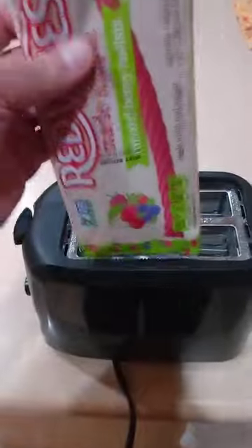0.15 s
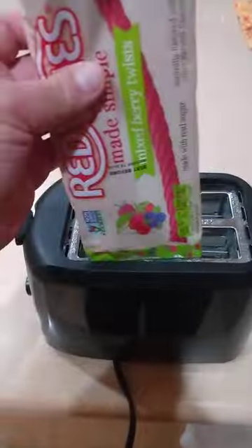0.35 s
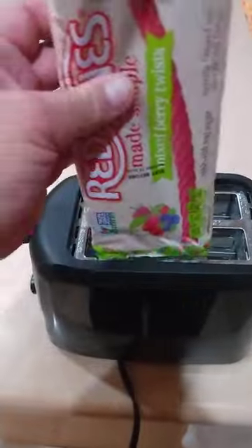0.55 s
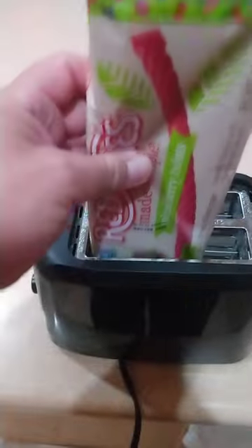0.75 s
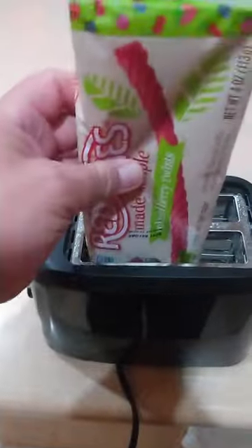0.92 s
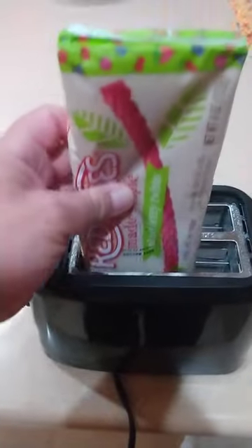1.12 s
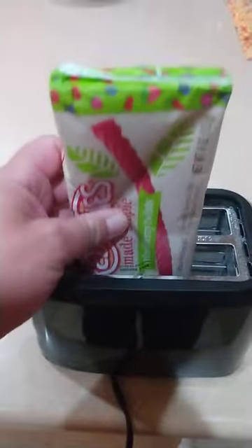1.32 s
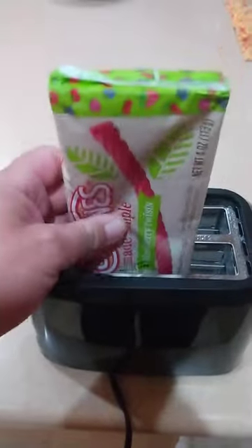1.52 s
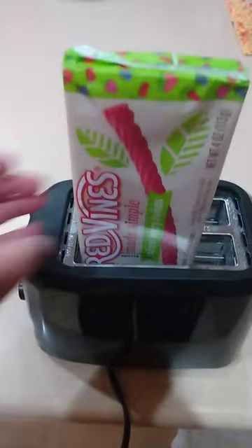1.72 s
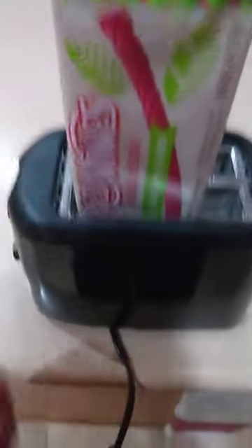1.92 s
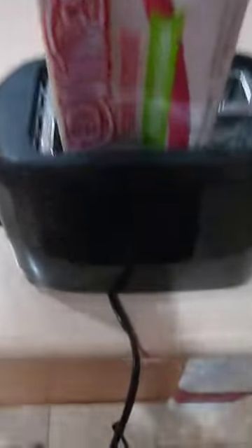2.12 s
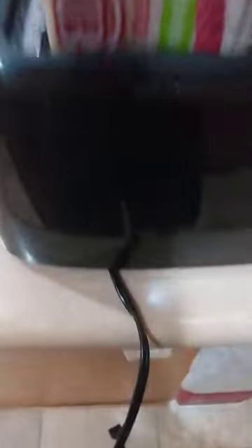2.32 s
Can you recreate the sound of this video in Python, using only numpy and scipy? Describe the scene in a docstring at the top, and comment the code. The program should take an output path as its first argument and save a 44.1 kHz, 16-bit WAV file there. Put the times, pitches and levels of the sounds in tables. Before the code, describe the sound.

A stiff plastic candy packet crinkles close to a phone microphone: faint clicks, a sharp snap and crackle, a longer rustling burst as it slides into a toaster slot, then scattered ticks and quiet in a small kitchen.

```python
"""Faint clicks of film over soft rubbing come first, then loud bursts of snaps and crackle, then quiet.
A stiff plastic packet is pushed by hand into a toaster slot in a small kitchen.
Slips of each crease ring short film modes; rubbing is crackle and noise, with a low push of the hand.
The toaster knocks softly as a low ringing tone, and a low drone, made of ringing noise, wavers.
Soft room noise and echoes of the snaps lie behind. A phone microphone gives a narrow band."""
import sys
import numpy as np
from scipy import signal
from scipy.fft import rfft, irfft
from scipy.io import wavfile

SR = 44100
rng = np.random.default_rng(int(sys.argv[2]) if len(sys.argv) > 2 else 0)


def wav_record(signal):
    """Record a signal, one row per channel, as 16-bit PCM in the file named by sys.argv[1]."""
    frames = np.transpose(np.atleast_2d(signal))
    bounded = np.clip(frames, -1, 1)
    # unit amplitude maps onto the largest positive 16-bit level
    quanta = np.round(bounded * 32767).astype(np.int16)
    wavfile.write(sys.argv[1], SR, quanta)


def amplitude_ratio(level_db):
    """Convert a level in decibels to the matching linear amplitude (field) ratio."""
    exponent = np.asarray(level_db, float) / 20
    return 10 ** exponent


N = 103635  # samples, 2.35 s

# Snaps: modes spread about this far either side of the pitch (octaves) and die by 60 dB in T60.
PANEL_SPREAD_OCT, PANEL_T60_S = 0.683, 0.012
FACET_SPREAD_OCT, FACET_T60_S = 0.38, 0.0084
TICK_HZ, TICK_SPREAD_OCT, TICK_T60_S = 6680, 0.4, 0.0052
THUMP_HZ, THUMP_SPREAD_OCT, THUMP_T60_S = 390.6, 0.66, 0.018
OUTER_MODE_DB = -4.5  # the outermost modes are weaker
SLIP_FALL_S, SLIPS_PER_S, AFTERSLIP_DB = 0.0054, 2400, -16  # AFTERSLIP_DB: typical size at the start

# Creases that snap: [t/s, wide panel peak level/dB, panel f/Hz, narrow facet peak level/dB, facet f/Hz,
# treble tick peak level/dB, thump peak level/dB]
CREASE_SNAPS = [(0.0339, -44, 1130, -49, 3700, -52.5, -67), (0.045, -52.5, 1270, -54, 2940, -72, -72),
                (0.0862, -71, 1370, -66, 3300.0, -67, -63), (0.091, -58, 1440, -61, 3410.0, -59, -65),
                (0.1199, -54, 1780, -55.5, 4030, -56.5, -80), (0.2146, -45, 1650, -46, 3070, -78, -51),
                (0.2232, -27.5, 1750, -29, 3110, -39, -41.5),
                (0.2313, -28.5, 1495, -30.5, 3280, -33, -46.5),
                (0.2604, -29, 1170, -29.5, 3640, -31, -31.5), (0.2631, -12, 1410, -29, 4090, -24, -32),
                (0.2688, -33, 1150, -28.5, 3320, -37, -41), (0.272, -30, 1236, -30, 4600, -38, -35.5),
                (0.2756, -28, 1670, -27.5, 2680, -31, -34.5), (0.3013, -32.5, 1500, -35.5, 3030, -46, -45),
                (0.3524, -37.5, 1590, -43, 3130, -50.5, -52), (0.3806, -42, 1360, -40.5, 3480, -36, -58.5),
                (0.39, -51, 1430, -53, 3100, -52, -63), (0.4276, -44, 1340, -59, 3400.0, -66, -54.5),
                (0.4446, -46.5, 1700, -39.5, 3650, -52, -60), (0.4595, -52, 1830, -50, 3100, -52, -70),
                (0.53, -50, 1720, -49, 4230, -41.5, -76), (0.558, -43.5, 1610, -53, 3580, -49, -63),
                (0.5655, -41.5, 1580, -58, 2900, -71, -52), (0.5859, -43, 1530, -55, 3150, -70, -58.5),
                (0.597, -46, 1600, -46.5, 4270, -52.5, -52), (0.6076, -46, 1690, -39.5, 2920, -48, -63),
                (0.646, -56, 1510, -56, 3480, -56, -66), (0.6773, -42, 1730, -47, 3400, -49, -52),
                (0.6935, -23.5, 1950, -34, 2640, -24.5, -34.5), (0.699, -35, 1390, -43, 3400, -42, -31),
                (0.706, -19.5, 1430, -32, 3274, -28, -28), (0.7072, -24, 1930, -23.5, 3320, -24, -48),
                (0.7118, -22, 1274, -41, 3500, -33.5, -46), (0.7183, -42, 1660, -45, 3000.0, -32, -36),
                (0.7921, -29.5, 1470, -34.5, 3310, -40, -56), (0.8047, -35, 1680, -28, 2860, -34.5, -48),
                (0.81, -40, 1560, -47, 2800, -35, -61), (0.8168, -35, 1536, -43, 2840, -41.5, -46),
                (0.8336, -26, 1740, -31, 3570, -43, -34.5), (0.8457, -30, 1740, -37, 3060, -38, -40),
                (0.8539, -25, 1290, -30, 3660, -39, -59), (0.8678, -31, 1520, -37, 2910, -43, -48.5),
                (0.9, -53, 1490, -40, 3760, -46, -58), (0.908, -24.5, 1555, -30, 3260, -33.5, -43),
                (0.9346, -42, 1670, -41, 3850, -39, -46.5), (0.9704, -43.5, 1600, -50, 3500, -58, -56),
                (1.094, -44.5, 1490, -40, 2960, -48.5, -55.5), (1.1734, -39.5, 1170, -46, 3200, -52, -61),
                (1.2096, -35.5, 1670, -41, 3730, -40, -48), (1.232, -35, 1213, -53, 3570, -41, -46.5),
                (1.2437, -32, 1420, -39, 4040, -36.5, -71), (1.297, -54, 1330, -47, 4080, -50, -72),
                (1.315, -43, 1450, -47, 3430, -43, -53), (1.3577, -68, 1550, -47.5, 4200, -48, -59),
                (1.3819, -28, 1395, -26, 3070, -33.5, -60), (1.4116, -46, 1530, -45, 3620, -63, -52),
                (1.4264, -29, 1460, -30.5, 2690, -31.5, -49.5), (1.4389, -49, 1250, -46, 3700, -52, -59),
                (1.451, -54, 1570, -48.5, 4500, -61, -56), (1.501, -49, 1440, -50, 3240, -58, -65),
                (1.5108, -40, 1470, -31, 4360, -34.5, -59), (1.5342, -41, 1860, -41, 3520, -47, -76),
                (1.5411, -44, 1530, -47, 4140, -42.5, -56), (1.5572, -54, 1700.0, -38, 3200, -47, -70),
                (1.596, -40, 1480, -43, 3730, -43, -60), (1.6094, -62, 1720, -55, 3950, -49, -66),
                (1.6147, -32, 2135, -29, 4930, -37, -64), (1.6285, -44, 2090, -46, 3300, -45, -56),
                (1.6345, -49, 1600, -38.5, 3760, -37.5, -57), (1.6416, -40, 1680, -52, 3670, -41, -57),
                (1.659, -41, 1750, -49, 3940, -57, -69), (1.686, -43, 1860, -41, 3830, -43.5, -62),
                (1.6984, -42, 1430, -43.5, 3000, -63, -61), (1.7041, -43, 1440.0, -49, 2970, -52, -73),
                (1.7273, -59, 1620, -61, 4060, -62, -71), (1.7724, -49.5, 1700.0, -42.5, 3100, -44.5, -72),
                (1.8293, -54.5, 1190, -74, 3010.0, -75, -68), (1.8727, -51, 1260, -65, 3370, -82, -67),
                (1.9161, -33, 1867, -38, 3240, -64, -78), (1.9255, -46, 1900, -58, 3300, -62, -65),
                (2.249, -58, 1810, -58.5, 4350, -51, -63.5)]


def snaps():
    """A crease gives way at once and weaker slips follow; they ring a panel, a facet, a tick and a thump."""
    out, size = np.zeros(N + SR), 2400
    t = np.arange(400) / SR
    shape = amplitude_ratio(AFTERSLIP_DB) * np.exp(-t / SLIP_FALL_S)
    slips = rng.standard_normal((len(CREASE_SNAPS), 400))
    slips *= (rng.random(slips.shape) < SLIPS_PER_S / SR) * shape
    slips[:, 0] = 1  # the first slip
    shifts = rng.uniform(-0.26, 0.17, (len(CREASE_SNAPS), 4, 7))
    for row, slip, row_shifts in zip(CREASE_SNAPS, slips, shifts):
        s, panel_db, panel_hz, facet_db, facet_hz, tick_db, thump_db = row
        slip = np.pad(slip, (0, size - len(slip)))
        start = int(s * SR)
        parts = [(panel_db, panel_hz, PANEL_SPREAD_OCT, PANEL_T60_S),
                 (facet_db, facet_hz, FACET_SPREAD_OCT, FACET_T60_S),
                 (tick_db, TICK_HZ, TICK_SPREAD_OCT, TICK_T60_S),
                 (thump_db, THUMP_HZ, THUMP_SPREAD_OCT, THUMP_T60_S)]
        for (db, hz, spread, t60), shift in zip(parts, row_shifts):
            part = film_modes(slip, hz, spread, t60, shift)
            out[start:start + size] += amplitude_ratio(db) * part / np.abs(part).max()
    return out[:N]


def film_modes(slip, hz, spread_oct, t60, shift):
    """Seven short modes around one pitch ring together, with alternating signs."""
    ladder = np.linspace(-1, 1, 7)
    pitches = np.minimum(hz * 2 ** (spread_oct * (ladder + shift)), 0.4 * SR)
    heights = amplitude_ratio(OUTER_MODE_DB * ladder ** 2)
    modes = sum((-1) ** k * heights[k] * ring(slip, f, t60) for k, f in enumerate(pitches))
    edges = [pitches[0] * 0.8, pitches[-1] * 1.2]
    return signal.sosfilt(signal.butter(2, edges, "band", fs=SR, output="sos"), modes)


# Balance inside the rubbing, before its overall level is set
CRACKLE_DB, SMOOTH_DB = -5.5, -6
FLUTTER_DB, FLUTTERS_PER_S = 2.2, 30  # spread and pace of the wavering of the smooth noise

# Handling: [t/s, rubbing level/dB, level of its treble/dB, level of the low push of the hand/dB]
HAND_MOVES = [(0, -66.5, -74, -61), (0.03, -67, -76, -74), (0.06, -74, -82.5, -70), (0.2, -75, -80, -64),
              (0.24, -57, -75, -51.5), (0.285, -49, -56.5, -50.5), (0.32, -50, -63, -46.5),
              (0.37, -53.5, -67.5, -61.5), (0.41, -59, -68.5, -54), (0.5, -67, -76.5, -63.5),
              (0.57, -64.5, -73, -58.5), (0.63, -69, -76, -60.5), (0.67, -58.5, -70.5, -69),
              (0.73, -44.5, -49, -46), (0.75, -44.5, -58.5, -54), (0.79, -39.5, -48, -43),
              (0.82, -43.5, -48.5, -48), (0.85, -40.5, -48.5, -43), (0.885, -49, -59, -52.5),
              (0.92, -55, -63, -52), (0.96, -58.5, -64.5, -55), (1.05, -66.5, -76.5, -65.5),
              (1.1, -60, -64.5, -64), (1.16, -58, -60, -59), (1.23, -49.5, -53.5, -55.5),
              (1.27, -52.5, -60, -54.5), (1.35, -58, -59, -64), (1.4, -53, -62.5, -55.5),
              (1.45, -55, -62.5, -59), (1.48, -64, -70, -68), (1.58, -61, -63.5, -68),
              (1.65, -59, -61, -59.5), (1.72, -66.5, -70.5, -66), (1.8, -74, -76.5, -65.5),
              (1.88, -68.5, -76, -72), (1.92, -58.5, -60.5, -65), (1.95, -70.5, -78, -66.5),
              (2.0, -69.5, -79, -73), (2.22, -86, -83, -77), (2.27, -78.5, -72.5, -66.5),
              (2.35, -76, -68.5, -78)]
# Tone of the rubbing: [f/Hz, relative level/dB per Hz]
RUB_TONE = [(120, -52.5), (200, -27.5), (480, -3.5), (680, -8), (1060, 2.5), (1190, -4.5), (1360, 0.5),
            (1900, -1.5), (2120, 2.5), (3500, -5.5), (4550, -33.5), (7700, -120)]
# Tone of its treble: [f/Hz, relative level/dB per Hz]
TREBLE_TONE = [(1760, -49), (3000, 2), (3460, -3), (6670, -4), (7770, 2), (8510, -29.5), (11100, -58.5),
               (18700, -120)]
# Tone of the low push: [f/Hz, relative level/dB per Hz]
PUSH_TONE = [(20, -28.5), (40, 1), (70, 2), (120, 6), (250, -0.5), (450, -2), (700, -16.5), (1200, -59)]


def rubbing():
    """Film drags over metal and skin: crackle on smooth friction noise, and a low push."""
    level_db, treble_db, push_db = in_time(HAND_MOVES)
    flutter = amplitude_ratio(FLUTTER_DB * drift(FLUTTERS_PER_S))
    clicks = creases()  # the same creases sound in both bands
    body = crackle_on_friction(clicks, flutter, 400, 2650)
    treble = crackle_on_friction(clicks, flutter, 2500, 6050)
    push = colour(rng.standard_normal(N), PUSH_TONE) * amplitude_ratio(0.31 * drift(5.7))
    rub = amplitude_ratio(level_db) * colour(body, RUB_TONE) + amplitude_ratio(treble_db) * colour(treble, TREBLE_TONE)
    return rub + amplitude_ratio(push_db) * push


def crackle_on_friction(clicks, flutter, low_hz, high_hz):
    """Crackle from small creases lies on fluttering friction noise."""
    smooth = rng.standard_normal(N) * flutter
    return amplitude_ratio(CRACKLE_DB) * crackle(clicks, low_hz, high_hz) + amplitude_ratio(SMOOTH_DB) * smooth


CRACKLES_PER_S, CRACKLE_SPREAD_DB = 1500, 2.5  # the pace when clumping is neutral; spread of sizes
CLUMP_DB, CLUMPS_PER_S = 2.5, 40  # how strongly and how fast the pace of crackles drifts


def creases():
    """Small creases give way at random, in clumps."""
    sizes = amplitude_ratio(CRACKLE_SPREAD_DB * np.minimum(rng.exponential(1, N), 4)) * rng.choice([-1, 1], N)
    pace = CRACKLES_PER_S * amplitude_ratio(CLUMP_DB * drift(CLUMPS_PER_S))
    return sizes * (rng.random(N) < pace / SR)


CRACKLE_CYCLES = 4.8  # cycles until a ring has fallen by 60 dB


def crackle(clicks, low_hz, high_hz):
    """Each small crease rings a few cycles on neighbouring pitches; roughly flat over the band."""
    pitches = np.geomspace(low_hz, high_hz, 16)
    dealt = rng.integers(0, 16, N)  # the middle pitch of each crease
    out = np.zeros(N)
    for k, hz in enumerate(pitches):
        near = clicks * (np.abs(dealt - k) < 4)
        out += hz / low_hz * ring(near, hz, CRACKLE_CYCLES / hz)
    return rms_one(out)


THUD_HZ, THUD_T60_S = 69.2, 0.06  # T60 of each of the two rings in a row

# The toaster rocks on the counter: [t/s, approximate peak level/dB]
TOASTER_KNOCKS = [(0.691, -51), (0.821, -50), (0.844, -56)]


def thuds():
    """Soft low knocks of the toaster body: ringing twice in a row makes each one swell, then fade."""
    s, db = np.transpose(TOASTER_KNOCKS)
    clicks = np.zeros(N)
    clicks[(s * SR).astype(int)] = amplitude_ratio(db)
    once = ring(clicks, THUD_HZ, THUD_T60_S)
    return ring(once, THUD_HZ, THUD_T60_S) * 40 / (THUD_T60_S * SR)  # peak near the click's height


DRONE_HZ, DRONE_T60_S = 119, 0.07

# The low drone swells and fades: [t/s, level/dB]
DRONE_SWELLS = [(0.0, -76), (0.12, -77.5), (0.31, -53), (0.52, -64.5), (0.67, -69.5), (0.71, -41),
                (0.73, -67), (1.12, -63), (1.26, -68), (1.29, -80), (1.45, -63), (1.52, -51.5),
                (1.57, -59.5), (2.35, -64.5)]


def drone():
    """A low resonance driven by noise wavers by chance and follows its swells."""
    tone = rms_one(ring(rng.standard_normal(N), DRONE_HZ, DRONE_T60_S))
    return amplitude_ratio(in_time(DRONE_SWELLS)[0]) * tone


ROOM_NOISE_DB = -68  # level before a slight wavering

# Tone of the room noise: [f/Hz, relative level/dB per Hz]
ROOM_NOISE_TONE = [(18, -45), (35, -24.5), (60, -13.5), (118, -13.5), (200, -18), (300, -14.5),
                   (600, -25.5), (1300, -26.5), (3000, -35), (7400, -40), (8500, -57.5), (11000, -90)]


def room_noise():
    """Soft noise of the room, mostly low, with a slightly wavering level."""
    return amplitude_ratio(ROOM_NOISE_DB) * colour(rng.standard_normal(N), ROOM_NOISE_TONE) * amplitude_ratio(0.47 * drift(16))


KITCHEN_T60_S, WALL_CUT_HZ = 0.24, 5100  # T60 of the lows; the treble dies faster
KITCHEN_DB = -24  # gain on the summed echoes


def kitchen(x):
    """Echoes between walls: eight feedback delays, duller on every round."""
    out = np.zeros(N)
    dull = np.exp(-2 * np.pi * WALL_CUT_HZ / SR)
    lags = (rng.uniform(0.008, 0.034, 8) * SR).astype(int)
    for k, lag in enumerate(lags):
        loop, state = x.copy(), [0.]
        gain = amplitude_ratio(-60 * lag / SR / KITCHEN_T60_S)
        for i in range(lag, N, lag):
            back, state = signal.lfilter([gain * (1 - dull)], [1, -dull], loop[i - lag:i], zi=state)
            loop[i:i + lag] += back[:N - i]
        out += (loop - x) * (-1) ** k  # echoes only
    return out


def rms_one(x):
    """Scale to rms 1."""
    return x / np.sqrt(np.mean(x ** 2) + 1e-20)


def in_time(rows):
    """Columns of a table as curves over time."""
    s, *columns = np.transpose(rows)
    return [np.interp(np.arange(N) / SR, s, c) for c in columns]


def drift(rate):
    """Slow chance with spread about 1: smoothed noise (rate in Hz), made at every 40th sample."""
    r = np.exp(-2 * np.pi * rate * 40 / SR)
    noise = rng.standard_normal(N // 40 + 2002)
    slow = signal.lfilter([1], [1, -2 * r, r * r], noise)[2000:]  # skip the settling
    return np.interp(np.arange(N) / 40, np.arange(len(slow)), rms_one(slow - slow.mean()))


def ring(clicks, hz, t60):
    """A unit click sets a sine ringing from height 1, falling by 60 dB in t60 seconds."""
    r, w = amplitude_ratio(-60 / (t60 * SR)), 2 * np.pi * hz / SR
    return signal.lfilter([0, np.sin(w)], [1, -2 * r * np.cos(w), r * r], clicks + 1e-18)


def colour(x, spectrum):
    """Give a flat signal a spectrum; rms 1."""
    hz, db = np.transpose(spectrum)
    grid = np.maximum(np.fft.rfftfreq(N, 1 / SR), 1)
    gain = amplitude_ratio(np.interp(np.log(grid), np.log(hz), db))
    return rms_one(irfft(rfft(x) * gain, N))


def scene():
    """Packet close by, the kitchen around it."""
    film = snaps()
    echoes = amplitude_ratio(KITCHEN_DB) * kitchen(film)
    return (film + echoes + rubbing() + thuds() + drone() + room_noise())[None]


def band_limit(x):
    """A steep low-pass at the top of the band."""
    return signal.sosfilt(signal.butter(12, 8660, fs=SR, output="sos"), x)


CUTOFF_HZ, BASS_CUT_HZ = 9606, 68  # from CUTOFF_HZ up all is at least 80 dB down
HISS_DB = -99


def record(dry):
    """The phone microphone's narrow band: bass and top are cut steeply, and faint hiss is added."""
    cut = signal.sosfilt(signal.cheby2(12, 80, CUTOFF_HZ, fs=SR, output="sos"), dry)
    cut = signal.sosfilt(signal.butter(3, BASS_CUT_HZ, "high", fs=SR, output="sos"), cut)
    hiss = amplitude_ratio(HISS_DB) * rng.standard_normal(dry.shape)
    return band_limit(cut + hiss)


dry = scene()
out = record(dry)
wav_record(out)
```